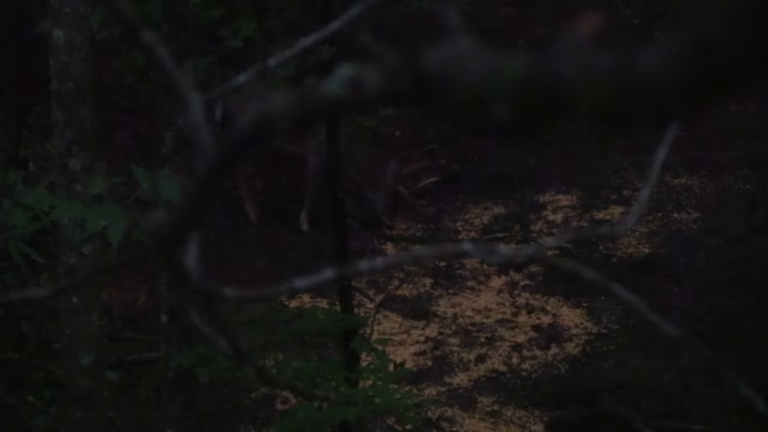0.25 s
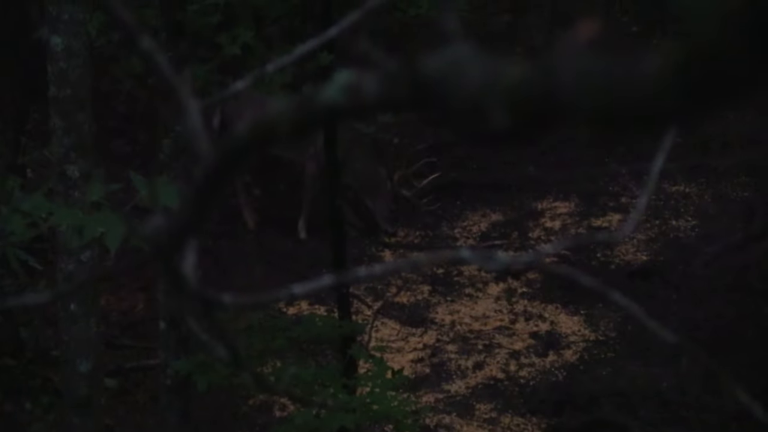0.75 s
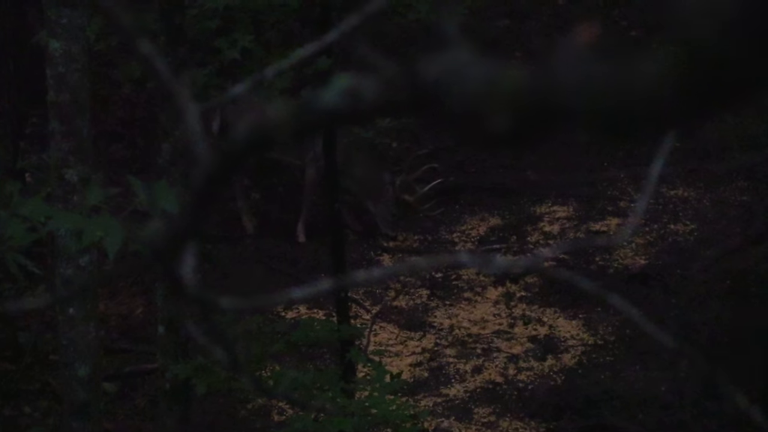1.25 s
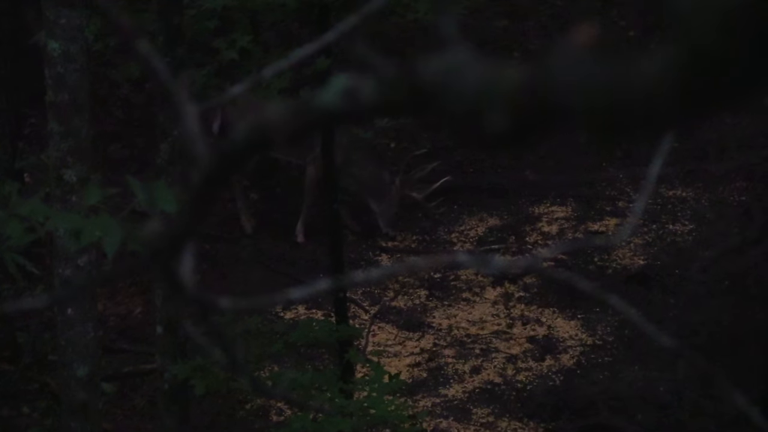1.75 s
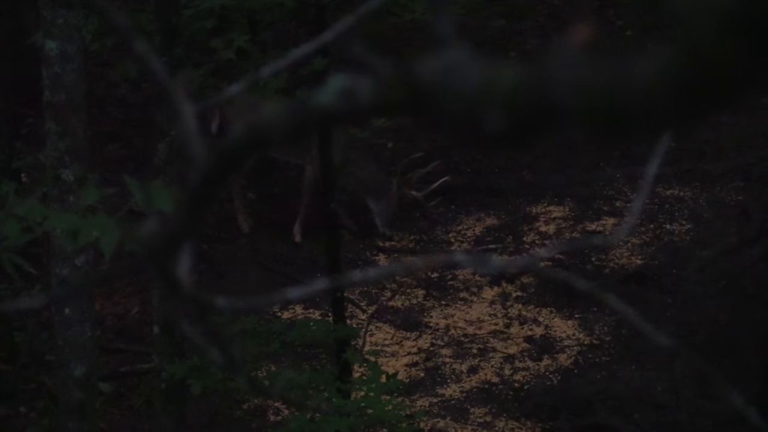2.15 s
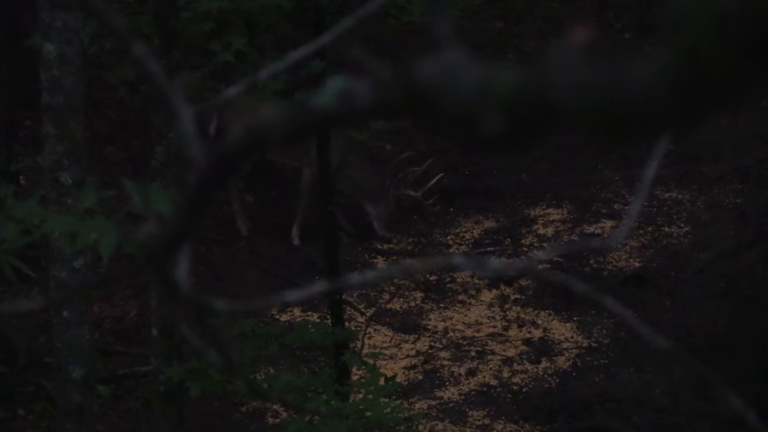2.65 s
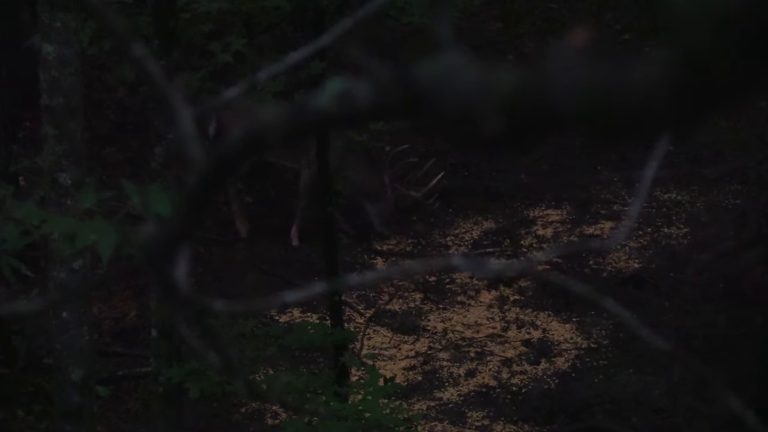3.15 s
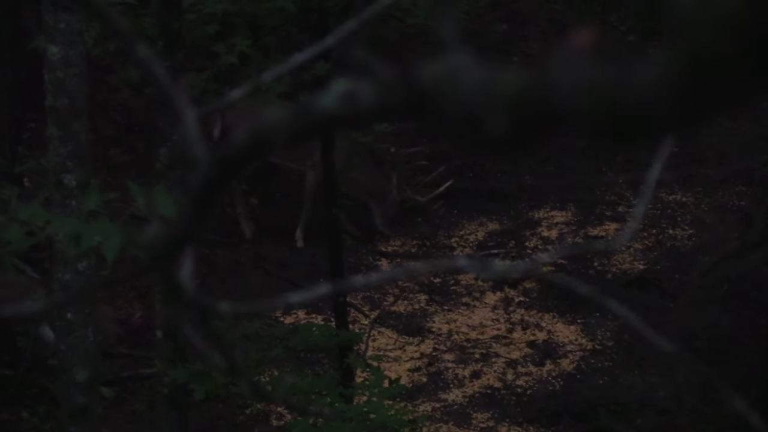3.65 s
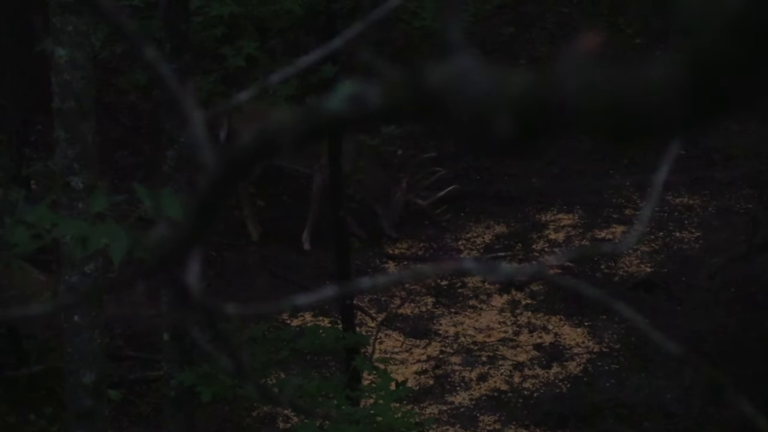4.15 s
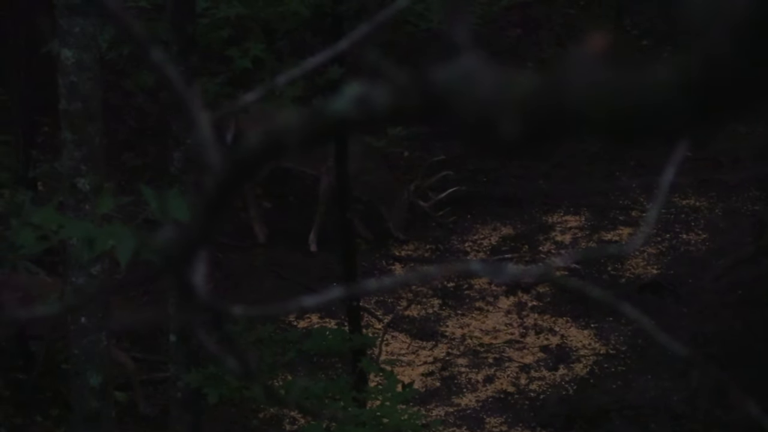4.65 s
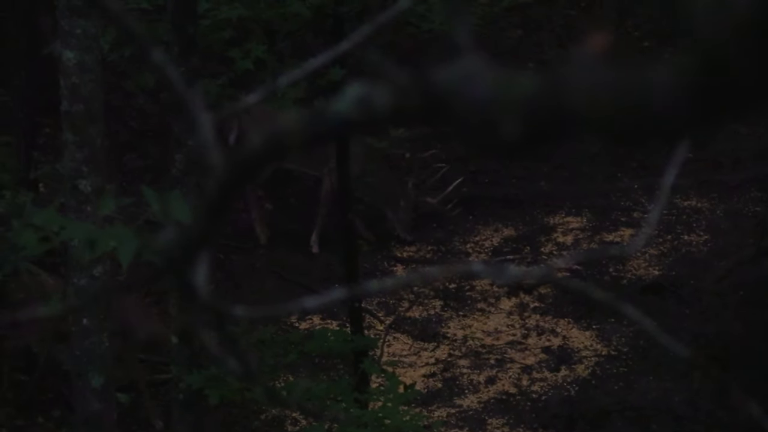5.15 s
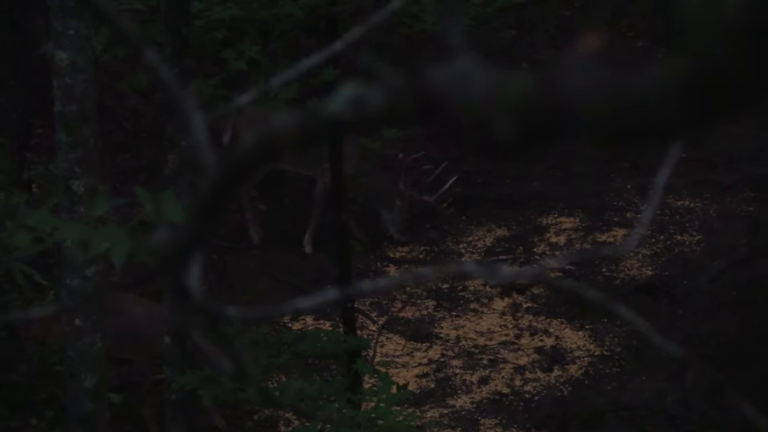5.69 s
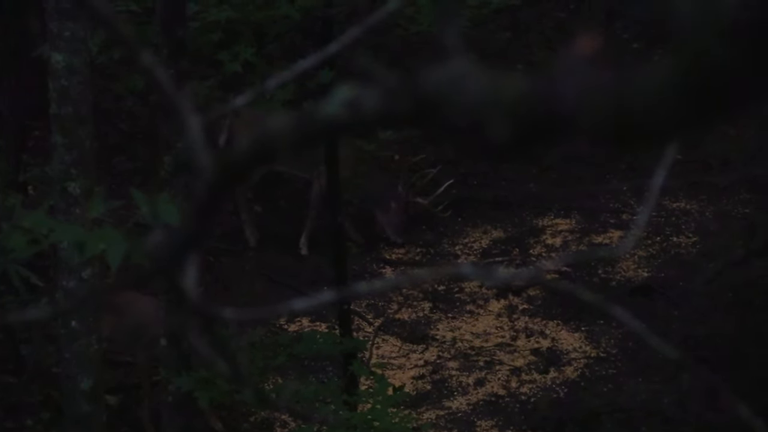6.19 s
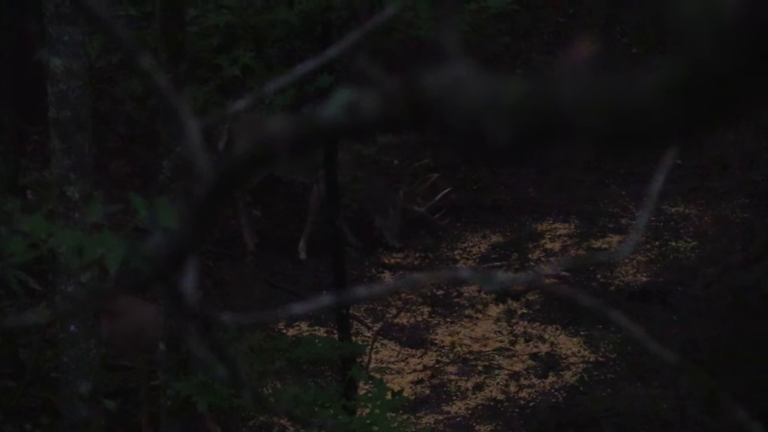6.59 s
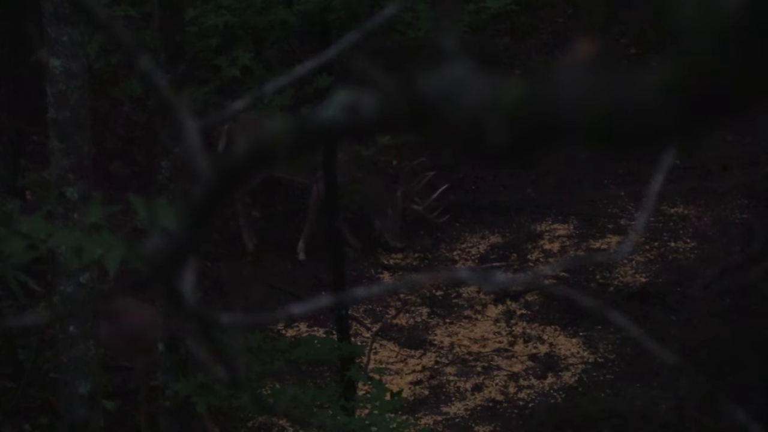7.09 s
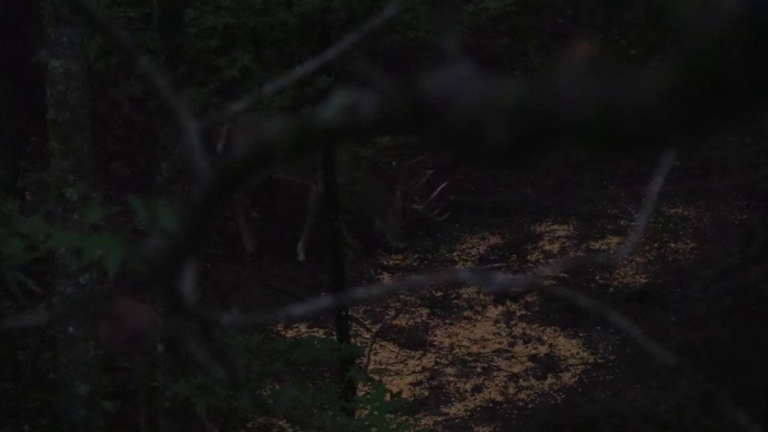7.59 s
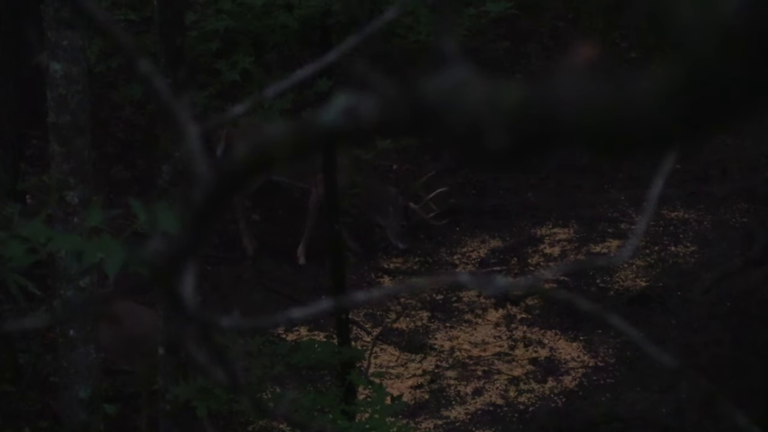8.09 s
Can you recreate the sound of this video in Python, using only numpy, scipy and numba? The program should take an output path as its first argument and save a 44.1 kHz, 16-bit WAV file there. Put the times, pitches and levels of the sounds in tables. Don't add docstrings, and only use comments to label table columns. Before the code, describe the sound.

A wet forest after rain, heard in mono through a small microphone with little bass. Throughout, thousands of distant drips blend into a quiet, even patter with soft mid-high hiss. Over it, close drops strike irregularly: short high taps on stiff leaves, lower fluttering pats on broad leaves and litter, and tiny bright splash ticks. A soft pat opens the scene, then at 0.4 s a drop gives a clear thin metallic ping, ringing briefly. Clusters tap around 1.1-1.4 and 2.1 s. A heavier, duller plop lands at 2.7 s, sharp strong drops at 3.9 and 4.6 s, another at 4.9. A very faint metal ping comes at 5.6 s. Further taps arrive at 5.9, 6.5, 6.9, 7.1 and 7.9 s, with quick little droplet showers at 2.1, 4.6 and 6.2-6.8 s. Trunks and foliage add a short blurred tail; the patter continues unchanged to 8.3 s.

```python
import sys
import numpy as np
from scipy import signal
from scipy.fft import rfft, irfft
from scipy.io import wavfile
from scipy.ndimage import uniform_filter1d
from numba import njit

SR = 44100
rng = np.random.default_rng(int(sys.argv[2]) if len(sys.argv) > 2 else 0)


def generate_wav(sig):
    pcm = np.round(np.clip(np.atleast_2d(sig).T, -1, 1) * 32767).astype(np.int16)
    wavfile.write(sys.argv[1], SR, pcm)


def gain_from_decibels(decibels):
    exponent = np.asarray(decibels, float) / 20
    return 10 ** exponent


N = 367353

# pitch_hz, density_db (per Hz)
CANOPY_COLOUR = [(15, -63), (25, -33), (161, -29), (516, -11), (1070, -3), (2480, -0.5), (3920, -3.5),
                 (8830, -14), (12500, -22), (14800, -32.5), (16000, -34)]
# time_s, level_db
DRIP_FLOW = [
    (0.0, -41),
    (3.87, -41),
    (4.34, -41.5),
    (4.78, -40.5),
    (5.82, -41.5),
    (7.03, -41.5),
    (7.35, -41),
    (8.33, -41),
]
# start_s, peak_db, pitch_hz
LITTER_DRIPS = [(0.0277, -46, 820), (0.2469, -37, 1210), (0.2804, -36, 1230), (1.4174, -39, 1180),
                (1.5049, -39, 900), (1.9548, -39, 1290), (2.0851, -32.5, 1150), (2.1192, -41, 1180),
                (2.4288, -33.5, 1280), (2.474, -36, 800), (2.6788, -50, 1030), (2.8673, -36, 1160),
                (4.911, -50, 1290), (5.1169, -42, 1030), (5.1673, -49, 1290), (5.3018, -47, 1290),
                (6.2434, -35, 1300), (6.4307, -41, 1080), (6.5277, -32.5, 1170), (6.9912, -39, 1210),
                (7.4473, -35, 1140), (8.3153, -46, 1270)]
# start_s, peak_db, pitch_hz
BROAD_DRIPS = [(0.1292, -36, 1590), (0.5979, -33, 2580), (0.8797, -36, 2330), (1.0466, -35, 1890),
               (1.3627, -33, 2020), (1.375, -29, 2750), (1.9361, -36, 2630), (2.232, -36, 1610),
               (2.3712, -33, 2110), (2.7786, -35, 2220), (2.8287, -37, 2110), (3.2107, -37, 2500),
               (3.3906, -34, 1460), (3.4095, -39, 1810), (3.4979, -36, 1570), (3.5322, -42, 1620),
               (3.8045, -38, 2020), (3.8925, -38, 2430), (4.1439, -35, 2300), (4.2507, -34, 2067),
               (4.7789, -36, 2020), (4.8032, -30.5, 1830), (4.9395, -32, 2370), (5.1516, -37, 2520),
               (5.3008, -36, 1370), (5.5805, -37, 1890), (5.685, -36, 1720), (5.7127, -34, 1890),
               (6.3043, -36, 2110), (6.7349, -30.5, 1863), (6.8342, -33, 2410), (6.9306, -32, 1500),
               (7.0446, -37, 1490), (7.4713, -33, 2410), (7.5703, -34, 1940), (7.8352, -34, 2410),
               (7.8613, -44, 1510), (7.8962, -33, 2300), (7.9989, -35, 2580), (8.2695, -35, 2480)]
# start_s, peak_db, pitch_hz
STIFF_DRIPS = [(0.473, -36, 2820), (1.1414, -38, 4240), (1.1653, -34, 4130), (1.5975, -38, 3040),
               (2.0101, -35, 2820), (2.1327, -34, 3010), (2.4736, -41, 2910), (2.7014, -33, 2990),
               (2.9975, -27, 3530), (3.0816, -39, 3400), (4.037, -41, 3060), (4.1555, -32, 3060),
               (4.9234, -36, 3190), (5.1419, -34, 2950), (5.3598, -38, 3900), (5.7279, -34, 4290),
               (6.1678, -35, 3230), (6.2601, -31, 3340), (6.5428, -38, 2930), (7.1172, -34, 3960),
               (7.2361, -33, 3770), (7.5451, -34, 3290), (7.9839, -39, 3340)]
# start_s, peak_db, pitch_hz
SPLASHES = [(0.5951, -40, 5880), (0.9366, -41, 7110), (1.1628, -43, 6180), (1.2439, -46, 6330),
            (1.3749, -38, 6010), (1.3998, -36, 5960), (2.0854, -37, 5750), (2.4434, -42, 6400),
            (2.7875, -42, 6830), (2.9969, -42, 6090), (3.1587, -46, 5530), (3.2424, -41, 5880),
            (3.2609, -36, 6680), (3.2759, -43, 6070), (3.4412, -43, 5680), (3.5178, -42, 6550),
            (3.9257, -34, 6200), (4.1435, -41, 5900), (4.5994, -39, 6740), (4.7977, -41, 5510),
            (4.8871, -43, 5900), (4.948, -45, 7730), (5.8995, -36, 5620), (5.9336, -30, 5680),
            (5.953, -40, 5510), (6.5427, -41, 6120), (6.8336, -44, 6140), (7.4746, -45, 6180),
            (7.7176, -41, 6050), (7.769, -41, 6350), (7.8345, -43, 6440)]
# start_s, peak_db, pitch_hz
MIST = [(0.0143, -50, 10340), (0.1438, -48, 11580), (0.4845, -51, 10960), (0.7918, -51, 10010),
        (1.0491, -50, 10400), (1.1141, -47, 11500), (1.1848, -51, 11180), (1.3748, -54, 11990),
        (1.5498, -47, 12320), (1.7748, -53, 10190), (2.4601, -49, 10640), (2.5148, -47, 11780),
        (2.6995, -49, 10010), (2.9754, -52, 10870), (3.2931, -50, 10140), (3.5498, -50, 12730),
        (3.777, -50, 12830), (4.2504, -53, 10140), (4.8986, -46, 10980), (4.9483, -53, 10270),
        (5.1419, -44, 10600), (5.3053, -47, 10530), (5.3313, -49, 10510), (5.648, -54, 11000),
        (5.7561, -48, 11090), (5.848, -51, 10640), (6.0802, -49, 11650), (6.5344, -49, 10340),
        (6.7634, -51, 11000), (7.0766, -47, 11690), (7.1191, -51, 10720), (7.383, -51, 11800),
        (7.5362, -44, 11110), (7.7577, -53, 10870), (7.9455, -48, 10010)]
# start_s, peak_db, blow_hz, leaf_hz, flutter_db
TAPS = [(0.599, -30, 3180, 3920, -15), (0.9215, -22, 3560, 3480, -15), (1.1647, -31, 3920, 2890, -6),
        (1.243, -31, 3700, 3060, -10), (1.306, -22, 3630, 2900, -14), (1.3745, -23, 3300, 2870, -23),
        (2.079, -27, 2920, 4550, -18), (2.0861, -22, 3400, 3650, -13), (2.428, -26, 4900, 4400, -11),
        (2.7885, -22, 3420, 3060, -18), (2.976, -25.5, 3780, 3590, -15), (2.998, -31, 3560, 3110, -13),
        (3.2608, -19, 3930, 4370, -22), (3.8933, -26, 3250, 3920, -13), (3.926, -16, 3540, 3170, -15),
        (4.5328, -19, 3800, 3800, -11), (4.5668, -13, 3450, 3330, -16.5), (4.91, -17, 3740, 3260, -27),
        (5.934, -27, 4370, 3170, -16), (6.2435, -25, 3460, 3640, -15), (6.528, -17, 3350, 3450, -14),
        (6.916, -17, 4900, 4900, -19), (7.0892, -19.5, 3600, 3150, -12), (7.876, -22.5, 4900, 4870, -17)]
# start_s, peak_db, pitch_hz
LIGHT_TAPS = [(0.0263, -23, 3460), (0.178, -23.5, 3360), (0.2813, -30, 4010), (1.0504, -32, 3960),
              (1.1144, -24, 3300), (1.1764, -25, 3310), (1.4104, -31, 2960), (1.4895, -21.5, 4030),
              (1.932, -31, 2970), (2.2827, -24.5, 2960), (2.4723, -42, 2900), (2.6988, -36, 3030),
              (3.017, -36, 3740), (3.0344, -24, 3100), (3.5164, -24, 3700), (3.5374, -27, 2910),
              (3.703, -26, 3120), (3.7753, -30, 3700), (4.8818, -31, 3730), (4.9726, -23, 3380),
              (5.1402, -25, 3050), (5.7269, -36, 4150), (5.8965, -26, 2920), (6.2824, -31, 3630),
              (6.5414, -23, 2940), (6.989, -22, 3000), (7.0634, -32, 3580), (7.4649, -26, 3020),
              (7.7164, -30, 3100), (7.86, -26, 4520)]
# start_s, peak_db, pitch_hz,
# t60_s
THUDS = [(0.0265, -36, 860, 0.031), (2.473, -39, 690, 0.025), (2.6678, -18.5, 360, 0.0052),
         (2.6692, -31, 270, 0.0065), (1.725, -49, 210, 0.068), (1.955, -52, 180, .06),
         (1.985, -51, 480, 0.037), (4.91, -28, 1900, 0.0094), (4.57, -35, 1200, .03),
         (4.5672, -30, 1300, .015), (7.091, -33, 1400, 0.019), (3.6, -26, 1400, 0.028),
         (3.926, -48, 420, .02), (3.681, -33, 1300, .006), (4.5665, -32, 980, 0.027),
         (5.933, -27, 880, 0.0079), (6.527, -48, 890, 0.0095), (7.0902, -40, 900, 0.012)]
# start_s, peak_db, blow_hz, leaf_hz, flutter_db
PATS = [(0.027, -18.5, 2170, 1410, -13.5), (0.179, -27, 2300, 1850, -9), (1.1148, -25.5, 2300, 2220, -8),
        (1.1178, -27, 1750, 1700, -12), (1.1694, -25, 1960, 1980, -8.5), (1.3092, -23, 1670, 2300, -20),
        (1.3747, -25, 2090, 1600, -18), (2.0792, -19.5, 1900, 2000, -25), (2.0846, -21, 2340, 2580, -15),
        (2.284, -21, 2200, 1490, -14), (2.429, -27, 2380, 2200, -11), (2.6676, -12.5, 1290, 1900, -18),
        (2.6699, -24, 1700, 845, -16), (2.7002, -14.5, 1990, 1680, -23), (3.9257, -12.5, 1750, 2550, -22),
        (4.5338, -21, 2150, 1900, -12), (4.5672, -18.5, 1970, 1920, -8), (4.9104, -28, 2550, 1670, -16),
        (5.8877, -24.5, 1440, 1710, -13), (5.933, -22, 2280, 2500, -13), (6.526, -22.5, 2420, 2450, -13),
        (6.5436, -28, 2210, 2170, -8), (6.9902, -20, 2290, 1710, -13), (7.09, -21.5, 1570, 1560, -8),
        (7.1217, -20, 1780, 1870, -15)]
# start_s, peak_db, pitch_hz
LIGHT_PATS = [(0.193, -30, 1570), (0.596, -27.5, 2160), (0.9205, -25, 1790), (1.1644, -32, 1830),
              (1.214, -28.5, 1950), (1.264, -25, 2180), (1.5492, -26.5, 1930), (1.8038, -28, 2010),
              (1.953, -35, 2080), (2.0624, -28, 2000), (2.2029, -30, 2300), (2.2654, -23, 2400),
              (2.4724, -25.5, 2240), (3.033, -28.5, 1270), (3.3966, -27.5, 1760), (3.433, -24, 2560),
              (3.5488, -26, 2110), (3.7038, -26.5, 2140), (3.7752, -28, 1900), (3.8911, -27, 2480),
              (4.0353, -27, 1800), (5.1404, -30, 2060), (5.1655, -25.5, 1930), (5.3979, -30, 1570),
              (5.898, -26.5, 1670), (6.075, -30, 1440), (6.9148, -26, 2310), (6.9314, -41, 1300),
              (8.1514, -24.5, 2340), (8.2447, -29, 1730)]
# start_s, peak_db, pitch_hz
FAINT_PATS = [(0.2803, -35, 2430), (0.8779, -32, 2340), (1.1398, -28, 1450), (1.2423, -29, 1630),
              (2.7864, -32, 1550), (3.017, -36, 2520), (3.1552, -30, 1500), (3.26, -26, 2380),
              (3.3972, -37, 1770), (3.4684, -24, 2550), (3.5414, -28, 2100), (3.7204, -33, 1750),
              (4.1425, -28, 2200), (4.7963, -30, 1670), (4.9721, -26, 1590), (5.2435, -26, 2030),
              (5.2999, -30, 2470), (5.3901, -25, 1770), (6.2412, -24, 2460), (6.4692, -34, 2100),
              (6.6129, -25, 2330), (6.7336, -36, 2100), (7.4664, -35, 1680), (7.86, -27, 1510)]
# start_s, peak_db, pitch_hz, flutter_db
TICKS = [(0.5793, -29, 6890, -16), (0.921, -33, 6730, -19), (1.3057, -25, 9400, -6),
         (1.3748, -29, 6630, -5.5), (1.411, -30, 7100, -9), (1.4907, -30, 7010, -15),
         (2.0784, -33, 9260, -19), (2.085, -30, 6770, -14), (2.4278, -37, 6820, -20),
         (2.667, -29, 9000, -11), (3.018, -23, 7780, -18), (3.2607, -35, 7090, -18),
         (3.3698, -29, 7150, -15), (3.7763, -31, 6590, -7), (3.8915, -31, 7300, -14),
         (3.925, -26, 8000, -9), (3.9325, -21, 9800, -16), (4.5323, -30, 8550, -10),
         (4.9105, -31, 8400, -8), (5.1417, -19, 6950, -20), (5.469, -28, 7220, -9),
         (5.9325, -31, 8800, -18), (6.138, -28.5, 6630, -7), (6.512, -26, 6900, -12),
         (6.5279, -38, 6890, -9), (6.9159, -24, 10350, -18), (7.09, -29, 7620, -8), (7.5351, -35, 8990, -5),
         (7.876, -25.5, 7510, -25), (7.9076, -25, 9330, -24)]
# start_s, peak_db, pitch_hz
LIGHT_TICKS = [(0.0992, -37, 8670), (0.1214, -34, 8060), (0.178, -37, 8190), (0.4584, -31, 8750),
               (1.1754, -35, 7280), (1.5484, -36, 8590), (1.7744, -43, 7260), (1.9324, -36, 8350),
               (2.1264, -36, 7580), (2.6988, -35, 7740), (2.7861, -37, 7700), (3.2924, -36, 8260),
               (3.8744, -34, 7520), (3.8954, -34, 8880), (4.1544, -36, 7470), (4.3214, -33, 9880),
               (4.5655, -38, 7570), (4.5979, -35, 7300), (4.8984, -34, 7380), (4.9474, -36, 7780),
               (5.2244, -40, 8740), (5.3904, -38, 7210), (5.8466, -37, 7250), (6.0786, -33.5, 7920),
               (6.4694, -40, 7640), (6.729, -31, 8040), (7.0454, -37, 7780), (7.4729, -38, 7780),
               (7.8344, -40, 8120), (7.9444, -36, 10100)]
# start_s, peak_db
PINGS = [
    (0.3929, -24),
    (5.6, -43.5),
]
# first_drop_db, second_drop_db, t60_s
METAL_MODES = [(-12.5, -40, 0.049), (-21, -40, .03), (-9, -30, 0.54), (-12, -30, 0.42), (-26, -41, .2),
               (-2, -20, 0.24), (-18, -30, .3), (-10, -1, 0.093), (-8, -12, 0.15), (-17, -14, 0.14),
               (-24, -8, 0.11), (-3.5, 0, 0.13), (-6, -12, 0.083), (-1.5, -12, 0.058), (-7, -8, 0.094),
               (-10, -8, .08), (-9, -14, 0.069), (-17, -10, 0.084), (-15, -22, .055), (-17, -12, .06),
               (-26, -18, .07), (-26, -20, .06), (-30, -25, .06), (-15, -40, 0.8), (-10, -25, .02)]
METAL_HZ = [860, 2300, 2689, 3245, 3763, 4437, 4511, 6158, 7330, 7461, 7701, 7745, 8183, 8249, 8938, 10019,
            10571, 11160, 13073, 13997, 14265, 14428, 15572, 2690, 12600]
# start_s, level_db, pitch_hz, length_s
SPRAYS = [
    (6.246, -32.5, 3600, 0.034),
    (4.583, -34.5, 2900, 0.023),
    (6.5, -45, 8100, 0.054),
    (2.1, -38, 4200, 0.036),
    (6.8, -35, 2500, 0.026),
]


@njit
def ring(start, hz, t60, size):
    out = np.zeros(N)
    for k in range(len(start)):
        turn = np.exp(2j * np.pi * hz[k] / SR - np.log(1000) / (t60[k] * SR))
        phasor = size[k] + 0j
        for i in range(start[k], min(N, start[k] + int(t60[k] * SR))):
            out[i] += phasor.imag
            phasor *= turn
    return out


def strike(s, hz, t60, size):
    s, hz, t60, size = (np.ravel(v) for v in np.broadcast_arrays(s, hz, t60, size))
    start = (np.clip(s, 0, N / SR) * SR).astype(np.int64)
    return ring(start, np.clip(hz, 50., .45 * SR), np.clip(t60, .001, 2.), 1. * size)


def bass_cut(x, hz):
    return signal.sosfilt(signal.butter(3, hz, "high", fs=SR, output="sos"), x)


def foliage(x, t60):
    t = np.arange(SR // 4) / SR
    build_up = 1 - np.exp(-t / 0.0051)
    tail = rng.standard_normal(len(t)) * build_up * 1000. ** (-t / t60)
    return signal.fftconvolve(x, tail / np.sqrt(np.sum(tail ** 2)))[:N]


def tint(x, colour):
    spec = rfft(x)
    hz = np.arange(N // 2 + 1) * SR / N + 1
    own = uniform_filter1d(abs(spec) ** 2, size=201) ** .5
    point_hz, point_db = np.transpose(colour)
    wanted = gain_from_decibels(np.interp(np.log(hz), np.log(point_hz), point_db))
    y = irfft(spec / own * wanted, N)
    return y / y.std()


def walk(rate):
    k = int(SR / rate)
    held = np.repeat(rng.standard_normal(N // k + 1), k)
    return 1.1 * uniform_filter1d(uniform_filter1d(held, k), k)[:N]


def patter():
    chance = rng.random((12000, 8))
    hz = 200 * 70 ** chance[:, 2:3] * np.exp((.3 + .6 * chance[:, 2:5]) * [0, 1, -1])
    size = gain_from_decibels(np.minimum(-3.2 * np.log(1 - chance[:, 1:2]), 9.)) * hz ** .5
    start = chance[:, :1] * N / SR + .0004 * chance[:, 5:]
    drops = strike(start, hz, 5.0 / hz + 0.0036, size)
    drops = drops / drops.std()
    drops = drops + gain_from_decibels(1.0) * foliage(drops, t60=0.069)
    hiss = gain_from_decibels(.7 * walk(30)) * rng.standard_normal(N)
    s, flow_db = np.transpose(DRIP_FLOW)
    flow = gain_from_decibels(np.interp(np.arange(N) / SR, s, flow_db) + 1.0)
    return flow * (tint(drops, CANOPY_COLOUR) * gain_from_decibels(-6.5) + tint(hiss, CANOPY_COLOUR) * gain_from_decibels(-2.5))


def leaves(s, db, hz, leaf_hz, flutter_db, cycles, soft, spread, rebound_s, t60, side_db):
    s = s - .6 / hz
    chance = rng.random((len(s), 3, 6))
    blow = strike(s, hz, cycles / hz, gain_from_decibels(db))
    blow = blow - strike(s, hz, .4 * cycles / hz, soft * gain_from_decibels(db))
    flutter = strike(s + 1 / hz, leaf_hz, t60, gain_from_decibels(db + flutter_db - 5.5))
    later = chance[:, 0] ** 1.508
    near_hz = leaf_hz * np.exp(spread * (2 * chance[:, 1] - 1))
    sign = np.sign(chance[:, 2] - .5)
    size = gain_from_decibels(db + flutter_db + side_db - 2.8 * later) * sign
    return blow + flutter + strike(s + 1 / hz + rebound_s * later, near_hz, t60, size)


def small_drips():
    out = 0
    kinds = ((LITTER_DRIPS, 9.5, .012), (BROAD_DRIPS, 9.5, .008), (STIFF_DRIPS, 9.5, .005),
             (SPLASHES, 12.5, .004), (MIST, 19.0, .005))
    for table, trim_db, t60 in kinds:
        s, db, hz = np.transpose(table)[:, :, None]
        out = out + leaves(s - 0.82 / hz, db + trim_db, hz, hz * 1.033, -11.0, cycles=5., soft=0.69,
                           spread=0.23, rebound_s=t60 / 3, t60=t60, side_db=-5.0)
    return bass_cut(out, 480.0)


def light(table, trim_db, onset_to_peak_s):
    return [(s + onset_to_peak_s, db + trim_db, hz, hz * 1.22 ** (-1) ** k, -19)
            for k, (s, db, hz) in enumerate(table)]


def taps():
    drops = TAPS + light(LIGHT_TAPS, trim_db=0.5, onset_to_peak_s=0.000963)
    s, db, *leaf = np.transpose(drops)[:, :, None]
    return leaves(s, db + 7.5, *leaf, cycles=5., soft=0.44, spread=0.37,
                  rebound_s=.004, t60=0.0049, side_db=-4.0)


def thuds():
    s, db, hz, t60 = np.transpose(THUDS)
    return bass_cut(strike(s, hz, t60, gain_from_decibels(db)), 280.0)


def pats():
    drops = PATS + light(LIGHT_PATS, trim_db=2.9, onset_to_peak_s=0.00123)
    drops = drops + light(FAINT_PATS, trim_db=-1.0, onset_to_peak_s=0.001085)
    s, db, *leaf = np.transpose(drops)[:, :, None]
    return leaves(s, db + 8.0, *leaf, cycles=5.24, soft=1.0, spread=0.35,
                  rebound_s=0.0041, t60=0.014, side_db=-8.0)


def ticks():
    bursts = TICKS + [(s + .0005, db + 3.0, hz, -15.) for s, db, hz in LIGHT_TICKS]
    s, db, hz, flutter_db = np.transpose(bursts)[:, :, None]
    return leaves(s, db + 7.5, hz, hz, flutter_db, cycles=3.5, soft=0.53, spread=0.55,
                  rebound_s=0.0023, t60=0.0022, side_db=-7.0)


def metal():
    *mode_db, t60 = np.transpose(METAL_MODES)
    s, db = np.transpose(PINGS)[:, :, None]
    sign = (-1.) ** np.unique(np.round(METAL_HZ, -1), return_inverse=True)[1]
    modes = strike(s, METAL_HZ, t60, sign * gain_from_decibels(db + mode_db))
    crack = strike(s[0], 3000 * 5.2 ** rng.random(40), 0.012, gain_from_decibels(-44.0))
    jolt = strike(s[0], 57.0, .06, gain_from_decibels(-59.0))
    return bass_cut(modes + crack, 550.0) + jolt


def sprays():
    s, db, hz, length = np.transpose(SPRAYS)[:, :, None]
    chance = rng.random((len(s), 3, 40))
    later = chance[:, 0] ** 0.99
    droplet_hz = hz * np.exp(.5 * chance[:, 1] - .25)
    size = gain_from_decibels(db - 3.1 * later - 3.7 * chance[:, 2])
    return strike(s + length * later, droplet_hz, 17.0 / hz, size)


def scene():
    far = patter() + metal()
    near = small_drips() + bass_cut(taps() + pats() + ticks() + sprays(), 613.0) + thuds()
    near = signal.sosfilt(signal.butter(2, 12500., fs=SR, output="sos"), near)
    sound = near + gain_from_decibels(-13.5) * foliage(near, t60=0.034) + far
    return np.array([sound, sound])


def band_limit(x):
    return signal.sosfilt(signal.butter(12, 15830, fs=SR, output="sos"), x)


def record(dry):
    mix = signal.sosfilt(signal.ellip(8, .2, 60, 15800, fs=SR, output="sos"), dry)
    return band_limit(mix)


dry = scene()
out = record(dry)
generate_wav(out)
```